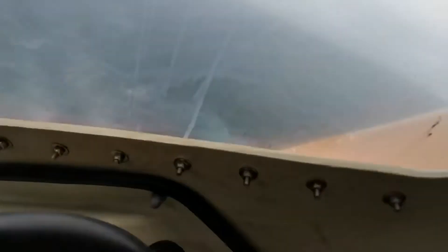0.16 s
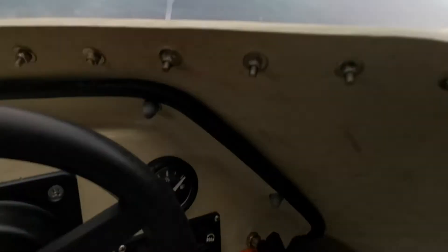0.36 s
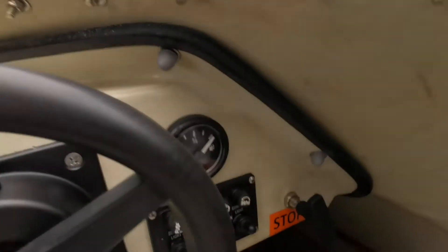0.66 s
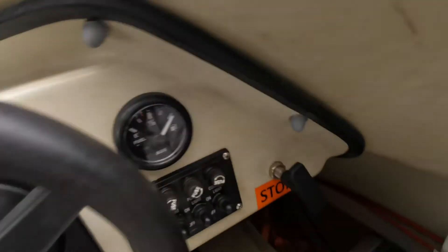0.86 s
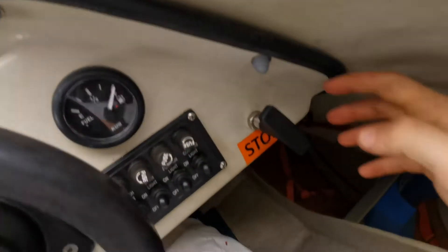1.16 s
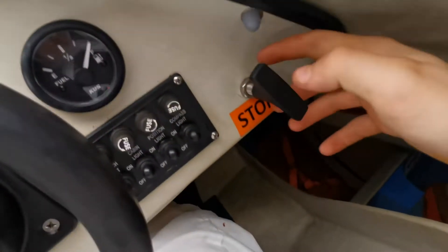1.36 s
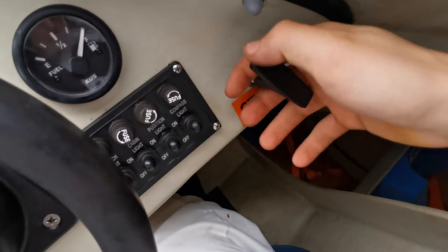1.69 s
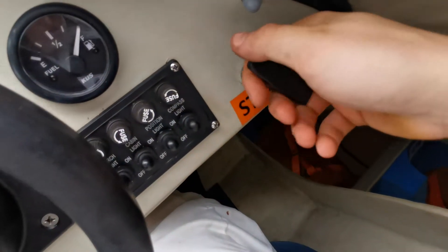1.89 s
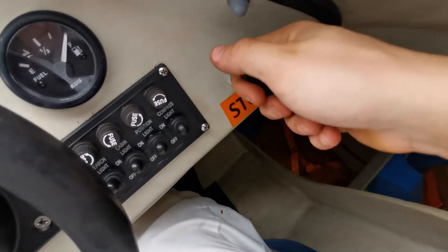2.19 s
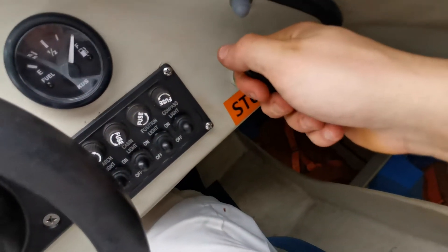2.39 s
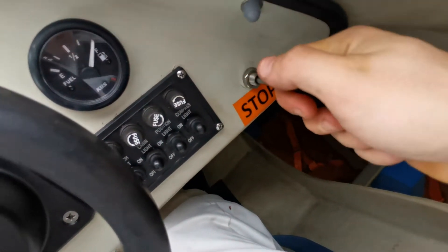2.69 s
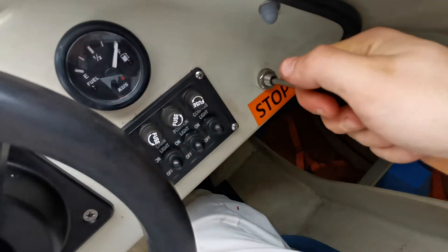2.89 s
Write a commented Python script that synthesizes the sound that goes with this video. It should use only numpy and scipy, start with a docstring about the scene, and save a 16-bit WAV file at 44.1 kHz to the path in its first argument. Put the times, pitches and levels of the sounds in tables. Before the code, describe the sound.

A diesel engine idles with a heavy low boom, rumble and clatter inside a small closed boat cabin; faint hand brushes and handle ticks, then it weakens and shudders. Close handheld microphone.

```python
"""A three-cylinder diesel idles behind the bulkhead of a small closed boat cabin: tones locked to its
firings make the pulse, boom and drone; shaped noise makes hull rumble, clatter and knock; fittings ring.
A hand brushes past, and the listening point moves from window to dashboard, reshading the tones and treble.
After a second brush the stop handle ticks. Then the fuel is cut: clatter and knock weaken, the speed sags,
the boom swells briefly and drops away, and the hull gives separate low shudders."""
import sys
import numpy as np
from scipy import signal
from scipy.fft import rfft, irfft, next_fast_len
from scipy.io import wavfile
from scipy.ndimage import uniform_filter1d, minimum_filter1d

SR = 44100
rng = np.random.default_rng(int(sys.argv[2]) if len(sys.argv) > 2 else 0)


def file_out(sig):
    """Save sig as 16-bit WAV at sys.argv[1]."""
    # one column per channel
    cols = np.atleast_2d(sig).T
    # limit, then scale
    lim = np.clip(cols, -1, 1)
    pcm = np.round(lim * 32767).astype(np.int16)
    wavfile.write(sys.argv[1], SR, pcm)


N = 134505
T = np.arange(N) / SR
CYLINDERS = 3   # one engine cycle is one firing of each
BOOM_ORDER = 3   # the boom's multiple of the firing rate
CLATTER_REPEATS = 0.19   # share of clatter and knock noise that is alike in every engine cycle

# engine speed before its small wander: (time [s], firing rate [1/s])
SPEED = [(0, 25.4), (.3, 25.65), (.52, 25.46), (1.0, 25.65), (1.4, 25.55), (1.8, 25.57), (2.3, 25.7),
         (2.7, 25.59), (2.77, 25.4), (2.84, 23.9), (3.05, 23.9)]
# way through the cabin's standing waves: (time [s], position [0 at the window to 1 at the dashboard])
APPROACH = [(0, 0.053), (.8, 0.21), (1.4, 1)]


def from_db(db):
    """Decibels to gain."""
    return 10 ** (np.asarray(db) / 20)


def rms_one(x):
    """Scale to unit rms."""
    return x / np.sqrt(np.mean(x ** 2) + 1e-20)


def in_time(rows):
    """Join (time, value) points by straight lines."""
    return np.interp(T, *np.transpose(rows))


def at_hz(points, hz):
    """Read (frequency, value) points on a log frequency axis."""
    f, value = np.transpose(points)
    return np.interp(np.log(hz + 1), np.log(f), value)


def pan(db):
    """Left and right gains for a level difference, half to each side."""
    return from_db(np.array([[.5], [-.5]]) * db)


def drift(rate):
    """Slow chance movement with spread 1: noise through two equal low-passes at rate [Hz]."""
    step = 40   # samples between the points that are joined by lines
    r = np.exp(-2 * np.pi * rate * step / SR)
    noise = rng.standard_normal(N // step + 2002)
    slow = signal.lfilter([1], [1, -2 * r, r * r], noise)[2000:]   # skip the filter's start
    return np.interp(np.arange(N) / step, np.arange(len(slow)), rms_one(slow))


def burst(age):
    """Rises to 1 at age 1, then dies away."""
    age = np.maximum(age, 0)
    return age * np.exp(1 - age)


def in_cabin(pair, spectrum):
    """Colour two noises, ripple them with the cabin's reflections, spread them left and right; rms 1."""
    # likeness of left and right, held within -1 to 1: (frequency [Hz], correlation)
    likeness = [(45, 3), (150, 0.6), (300, 0.86), (500, 0.36), (900, -0.04), (2000, -0.01), (5000, 0),
                (13000, 0)]
    # side that each band leans to: (frequency [Hz], left minus right [dB])
    balance = [(100, 5.5), (280, -3), (550, -1), (900, 0.5), (2000, 0.2), (4500, -0.4), (6700, 1.5),
               (8200, 7.5), (9200, 12), (10200, -3), (15000, 1)]
    ripple_db, ripple_hz = 1.5, 18   # depth and smoothing width of the reflections' ripple
    size = next_fast_len(N + SR // 2)
    hz = np.arange(size // 2 + 1) * SR / size
    ripple = rms_one(uniform_filter1d(rng.standard_normal((2, len(hz))), int(ripple_hz / hz[1])))
    colour = from_db(at_hz(spectrum, hz) + ripple_db * ripple)
    mid, side = rfft(pair, size) * colour
    alike = np.clip(at_hz(likeness, hz), -1, 1)
    both = np.sqrt(1 + alike) * mid + np.sqrt(1 - alike) * side * [[1], [-1]]
    return rms_one(irfft(both * pan(at_hz(balance, hz)), size)[:, :N])


def rattling(firings, repeats):
    """Dense contacts as noise: a share comes back alike in every engine cycle, the rest is new."""
    size = int(CYLINDERS * N / (firings[-1] - firings[0]))   # samples in one engine cycle
    place = (firings / CYLINDERS * size).astype(int) % size
    cycle = rng.standard_normal((2, size))[:, place]
    return np.sqrt(repeats) * cycle + np.sqrt(1 - repeats) * rng.standard_normal((2, N))


def partial(turns, multiple, db, rough_db):
    """One wavering tone locked to the engine."""
    level = from_db(db + rough_db * drift(21))
    return np.sqrt(2) * level * np.cos(2 * np.pi * multiple * turns)


def fittings(effort_db):
    """Covers and fittings ring at fixed pitches, each wavering separately on the left and right."""
    # resonances: (pitch [Hz], level at the window [dB rms], level at the dashboard [dB rms])
    rings = [(501, -47, -56.5), (685, -34, -56), (799, -50, -47.5), (900, -45.5, -49), (1128, -56.5, -45.5),
             (1626, -56.5, -48), (1980, -58.5, -49), (2708, -71, -56.5), (4600, -61.5, -60.5)]
    waver_hz, follows = 9, 0.55   # rate of waver; share of the effort's swing in dB
    near, out = in_time(APPROACH), 0
    for hz, window_db, dashboard_db in rings:
        swing = np.array([drift(waver_hz) + 1j * drift(waver_hz) for _ in range(2)])
        level = from_db(window_db + (dashboard_db - window_db) * near + follows * effort_db)
        out = out + level * np.real(swing * np.exp(2j * np.pi * hz * T))
    return out


def hull(firings):
    """Panels shaken by the engine: low noise that buzzes on each swing of the boom."""
    # panel colour before levelling: (frequency [Hz], relative density [dB per Hz])
    panels = [(12, -32), (32, -7), (60, -8), (110, -0.5), (170, 2.5), (205, 5), (235, -0.5), (280, 0.5),
              (305, -1), (330, -2.5), (385, -5), (415, -5), (460, -8.5), (800, -54.5)]
    # rumble loudness: (time [s], level [dB rms])
    rumble_level = [(0, -24.5), (.8, -24.5), (1.5, -22), (2.55, -23), (2.8, -26.5), (3.05, -24)]
    repeats, buzz_db = 0.54, 3.7   # share alike in every engine cycle; depth of the buzz
    buzz = from_db(buzz_db * np.cos(2 * np.pi * BOOM_ORDER * firings))
    return from_db(in_time(rumble_level)) * in_cabin(buzz * rattling(firings, repeats), panels)


def shudders():
    """The starved engine shakes the hull in separate, quickly dying sine swings."""
    # shudders: (start [s], pitch [Hz], peak of the envelope [dB])
    shakes = [(2.746, 156, -12.5), (2.806, 137, -17), (2.851, 290.4, -23), (2.924, 154, -20.5),
              (2.981, 328, -24), (3.024, 216, -26)]
    rise_s = 0.012
    out = 0
    for start, hz, db in shakes:
        out = out + from_db(db) * burst((T - start) / rise_s) * np.sin(2 * np.pi * hz * (T - start))
    return out


def hand():
    """Grainy noise of brushing hand and sleeve; noise snaps as the stop handle is turned and drawn out."""
    # brushes: (start [s], time until release [s], level before grain [dB])
    brushes = [(0.156, 0.039, -33), (1.573, 0.028, -31)]
    # cloth colour before levelling: (frequency [Hz], relative density [dB per Hz])
    cloth = [(500, 13), (1500, 11.5), (4600, 4.5), (6500, -2), (9000, -13), (12000, -20), (15500, -39)]
    # ticks of the stop handle: (start [s], starting level [dB], left minus right [dB])
    ticks = [(1.7448, -34, 10), (2.14, -33, 6), (2.1435, -41, -3)]
    # tick colour before levelling: (frequency [Hz], relative density [dB per Hz])
    metal = [(1500, -12), (4500, -8), (5800, -1), (7700, 7), (10000, -25), (15000, -30.5)]
    attack_s, release_s, grain_db, tick_decay_s = .008, 0.019, 3.5, 0.0012
    swell = 0
    for start, length, db in brushes:
        attack = np.clip((T - start) / attack_s, 0, 1)
        release = np.exp(-np.maximum(T - start - length, 0) / release_s)
        swell = swell + from_db(db) * attack * release
    snaps = 0
    for start, db, lr in ticks:
        snaps = snaps + pan(lr) * from_db(db) * (T >= start) * np.exp(-np.abs(T - start) / tick_decay_s)
    grain = from_db(grain_db * drift(150))
    brushing = swell * grain * in_cabin(rng.standard_normal((2, N)), cloth)
    return brushing + snaps * in_cabin(rng.standard_normal((2, N)), metal)


def clatter(firings, effort_db):
    """Injectors, valves and pistons rattle, swelling slightly each cycle; treble fades most with effort."""
    # rattle colour before levelling: (frequency [Hz], relative density [dB per Hz])
    rattle_colour = [(200, -31), (400, -3.5), (560, -2), (720, -1), (1130, -4), (1400, -9.5), (2000, -10),
                     (2800, -14), (4700, -16.5), (5500, -25), (7200, -25.5), (8800, -35.5), (10000, -41.5),
                     (12500, -41), (15500, -55.5)]
    level_db, swing_db, spread_db = -29, 0.3, 0.85   # loudness; swell in each engine cycle; chance waver
    treble_hz, treble_follows, treble_moved_db = 5200, 1.6, -1.25   # split; times effort; at the dashboard
    swell = from_db(spread_db * drift(14) - swing_db * np.cos(2 * np.pi * firings / CYLINDERS))
    sound = in_cabin(swell * rattling(firings, CLATTER_REPEATS), rattle_colour)
    body = signal.sosfiltfilt(signal.butter(4, treble_hz, fs=SR, output="sos"), sound)
    treble = sound - body
    treble_db = treble_follows * effort_db + treble_moved_db * in_time(APPROACH)
    return from_db(level_db) * (body * from_db(effort_db) + treble * from_db(treble_db))


def knock(firings, effort_db):
    """Diesel knock: one hard noise burst per firing, its strength set by cylinder and by chance."""
    # knock colour before levelling: (frequency [Hz], relative density [dB per Hz])
    knock_colour = [(250, -27.5), (480, -2), (700, -1.5), (1100, -2), (1500, -15), (2300, -19.5),
                    (4500, -28.5), (7000, -43), (14000, -63.5)]
    # strength of each cylinder in firing order: (level [dB])
    cylinder_db = [-3.5, 1.5, -0.5]
    level_db, spread_db, follows = -32, 1.5, 1.5   # loudness; stroke-to-stroke chance; times effort in dB
    rise_s, lead = 0.0064, 0.17   # lead in firings
    stroke, part = np.divmod(firings + lead + CYLINDERS, 1)
    stroke = stroke.astype(int)
    stroke_db = np.array(cylinder_db)[stroke % CYLINDERS] + spread_db * rng.standard_normal(N)[stroke]
    age_s = part / in_time(SPEED)
    level = from_db(level_db + stroke_db + follows * effort_db) * burst(age_s / rise_s)
    return level * in_cabin(rattling(firings, CLATTER_REPEATS), knock_colour)


def exhaust(firings, effort_db):
    """One pressure dip per firing, unequal between cylinders; the cabin's boom and drone swing against it."""
    # firing pulse at full effort: (multiple of the firing rate, level at position 0 [dB rms],
    # left minus right [dB], change at the dashboard [dB])
    pulse_partials = [(1, -22, 1.5, 1), (2, -24.5, 2.5, -.5), (4, -24, 4, 2), (5, -27.5, -4, 3),
                      (6, -22.5, 1.5, -12.5), (9, -34, 3.5, -1.5), (10, -35.5, -6, 0.5), (12, -39, 1.5, 7)]
    # in-between partials of unequal firing: (multiple of the engine cycle rate, level at position 0 [dB rms],
    # change at the dashboard [dB])
    uneven = [(4, -32.5, 4.5), (16, -37, 1.5), (20, -37, -0.5), (25, -50.5, 6.5), (28, -41, 4.5),
              (35, -45, 3.5), (40, -43, 0.5)]
    # boom that the cabin resonates with, before waver: (time [s], level [dB rms])
    boom_level = [(0, -7.5), (.6, -8), (1.2, -8.5), (2.1, -9), (2.75, -8.5), (2.8, -5.5), (2.88, -5.5),
                  (2.91, -11), (2.95, -13), (3.05, -16)]
    # drone that the cabin resonates with, before waver: (time [s], level [dB rms])
    drone_level = [(0, -26), (.7, -25), (1.5, -22), (2.5, -19.5), (2.7, -25), (2.76, -25), (2.81, -35),
                   (3.05, -40)]
    drone_order = 7   # multiple of the firing rate
    pulse_rough_db, uneven_rough_db, boom_rough_db, drone_rough_db = 1.7, 4.5, 0.5, 0.33   # waver
    near = in_time(APPROACH)
    drive_db = 1.5 * effort_db   # the pulse swings more than the effort
    pulse = 0
    for k, db, lr, moved_db in pulse_partials:
        pulse = pulse + pan(lr) * partial(firings, k, db + moved_db * near + drive_db, pulse_rough_db)
    lope = 0
    for k, db, moved_db in uneven:
        lope = lope + partial(firings / CYLINDERS, k, db + moved_db * near + drive_db, uneven_rough_db)
    boom = partial(firings, BOOM_ORDER, in_time(boom_level), boom_rough_db)
    drone = partial(firings, drone_order, in_time(drone_level), drone_rough_db)
    return boom + drone + lope - pulse


def scene():
    """One count of firings times the engine; combustion effort falls as the fuel is cut."""
    # strength of combustion: (time [s], level [dB])
    effort = [(0, -0.5), (1.0, 0), (1.8, -1), (2.3, -0.1), (2.66, -0.84), (2.79, -3.5), (2.91, -5.5),
              (3.05, -3.5)]
    speed_wander, first_firing_s = .002, .0043   # wander as a share of the speed
    rate = in_time(SPEED) * (1 + speed_wander * drift(10))
    firings = np.cumsum(rate) / SR - first_firing_s * rate[0]
    effort_db = in_time(effort)
    around = fittings(effort_db) + hull(firings) + shudders() + hand()
    engine = clatter(firings, effort_db) + knock(firings, effort_db) + exhaust(firings, effort_db)
    return around + engine


def record(dry):
    """A smooth limiter holds the highest swings; the top is cut steeply."""
    ceiling, limiter_s, stop_hz = .97, .008, 16200
    size = int(limiter_s * SR)
    needed = ceiling / np.maximum(np.abs(dry).max(axis=0), ceiling)
    held = minimum_filter1d(needed, 2 * size)
    gain = uniform_filter1d(uniform_filter1d(held, size), size)
    return signal.sosfiltfilt(signal.cheby2(14, 50, stop_hz, fs=SR, output="sos"), dry * gain)


dry = scene()
out = record(dry)
file_out(out)
```